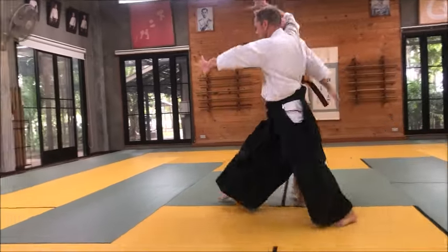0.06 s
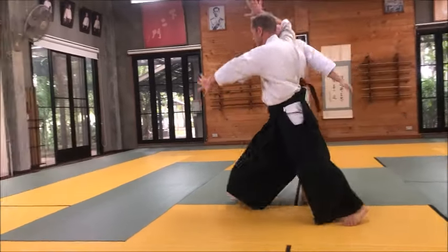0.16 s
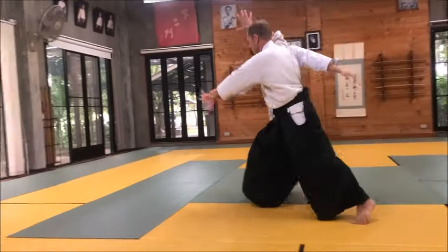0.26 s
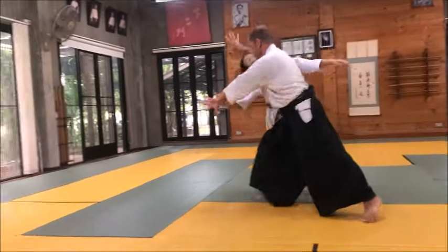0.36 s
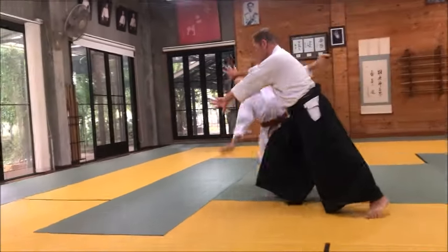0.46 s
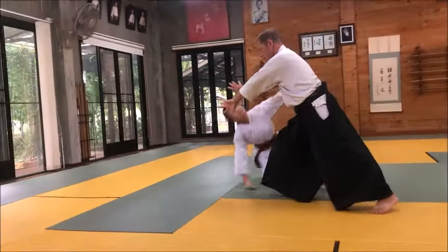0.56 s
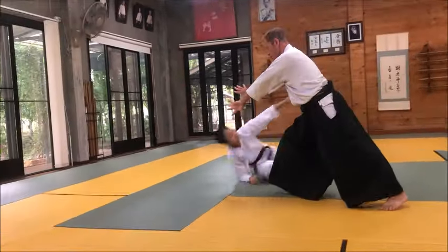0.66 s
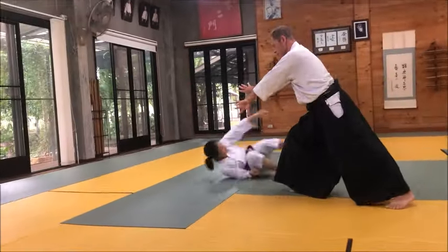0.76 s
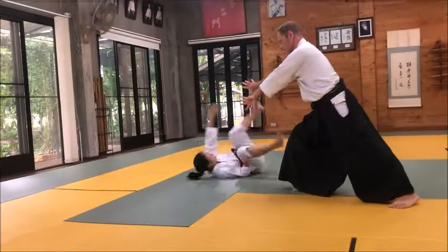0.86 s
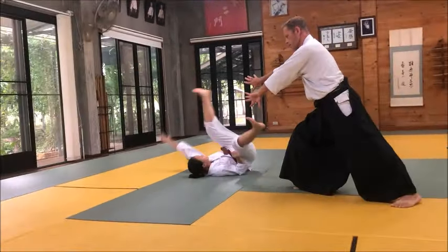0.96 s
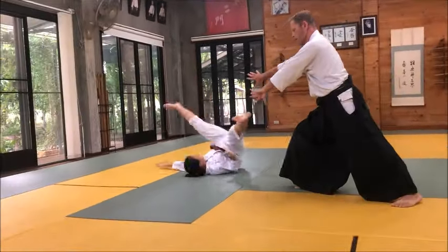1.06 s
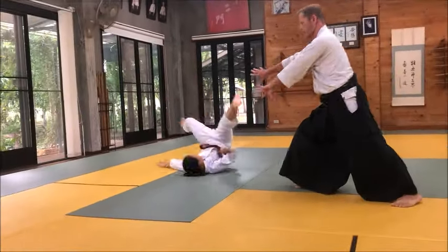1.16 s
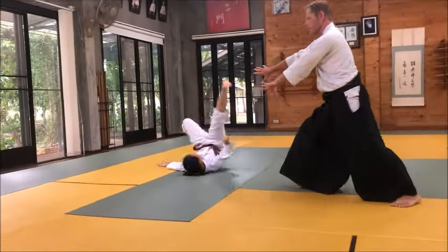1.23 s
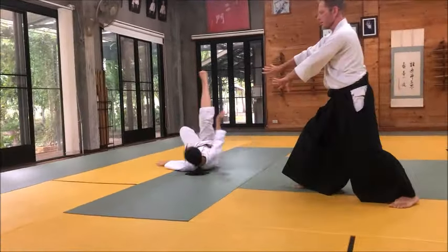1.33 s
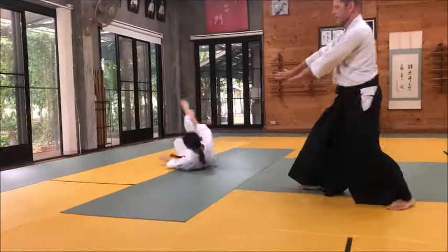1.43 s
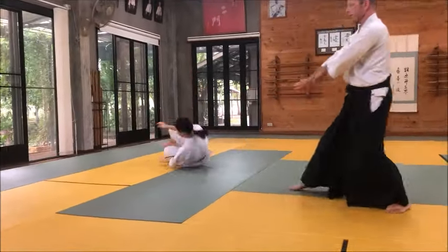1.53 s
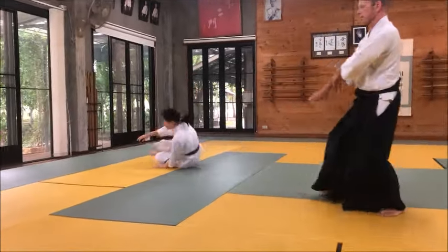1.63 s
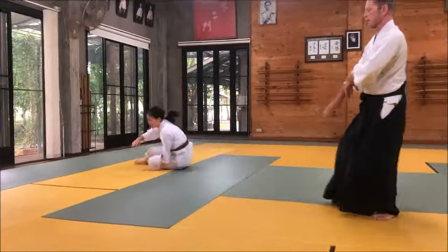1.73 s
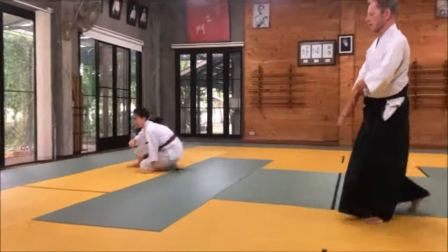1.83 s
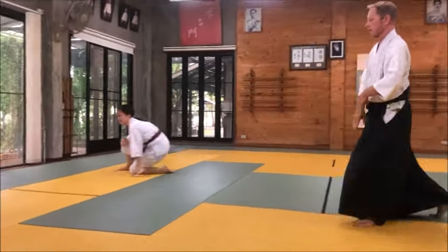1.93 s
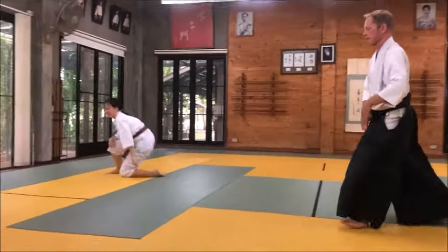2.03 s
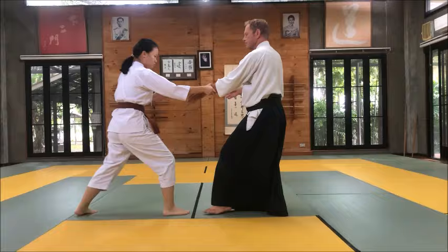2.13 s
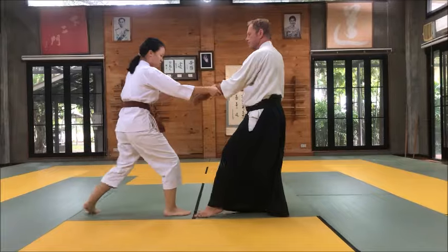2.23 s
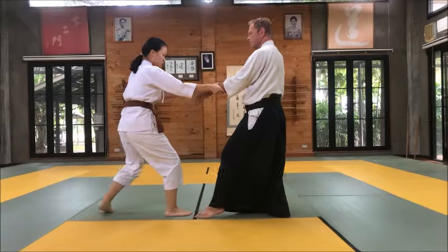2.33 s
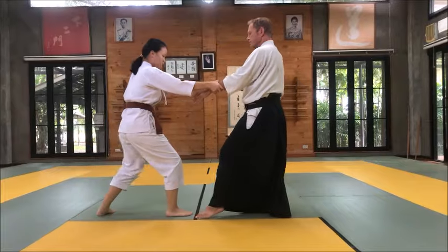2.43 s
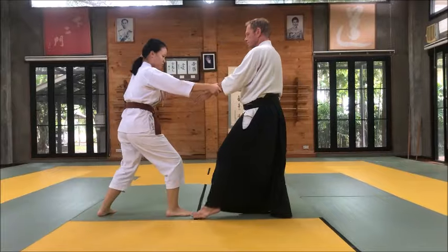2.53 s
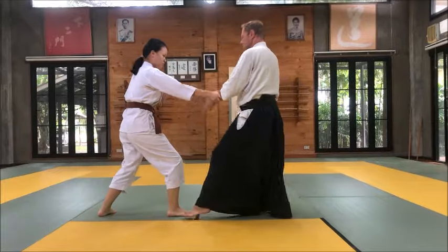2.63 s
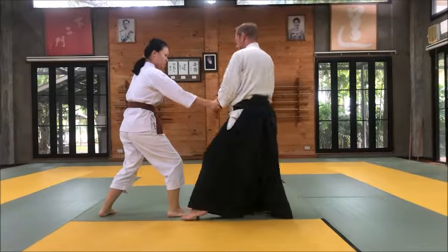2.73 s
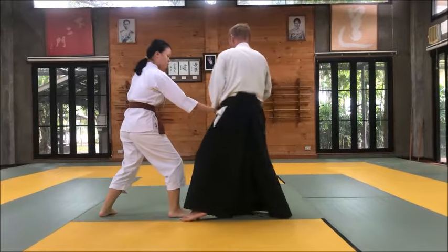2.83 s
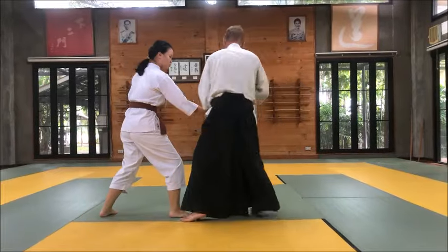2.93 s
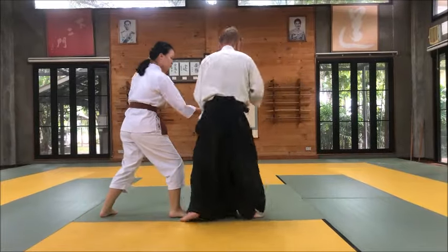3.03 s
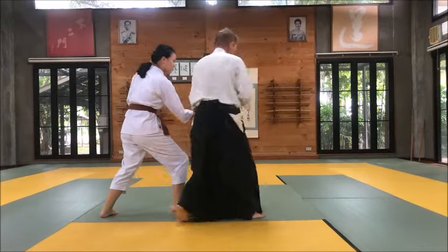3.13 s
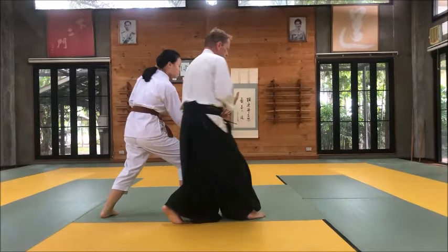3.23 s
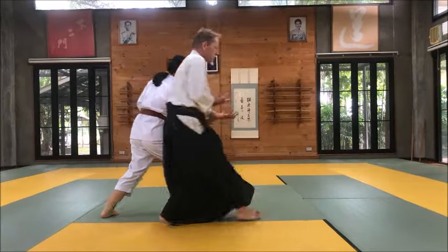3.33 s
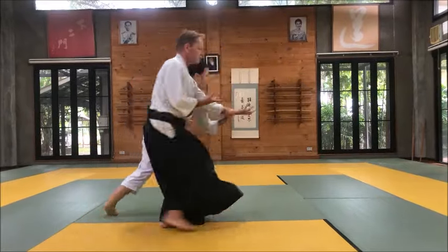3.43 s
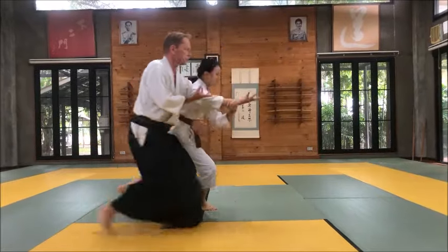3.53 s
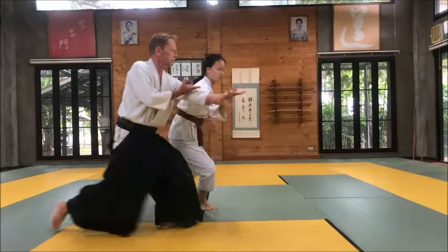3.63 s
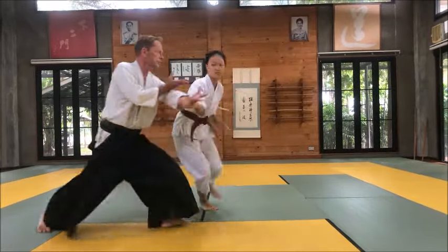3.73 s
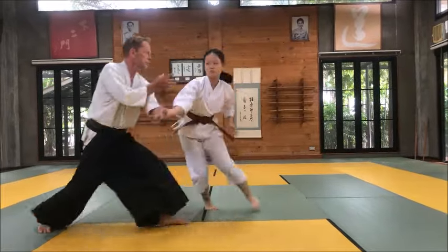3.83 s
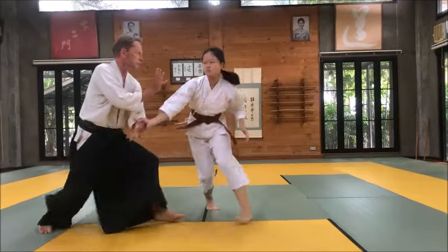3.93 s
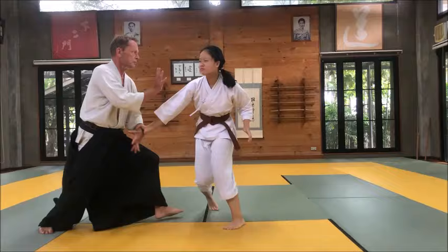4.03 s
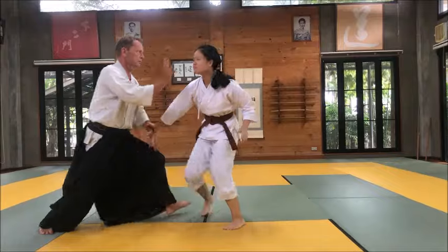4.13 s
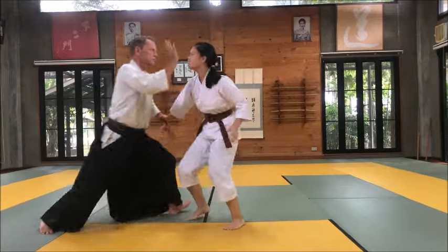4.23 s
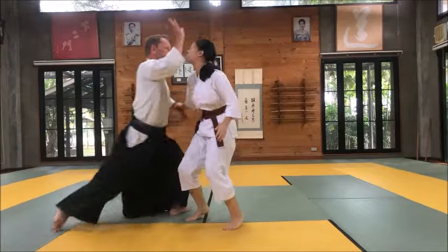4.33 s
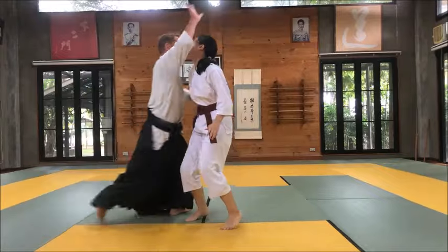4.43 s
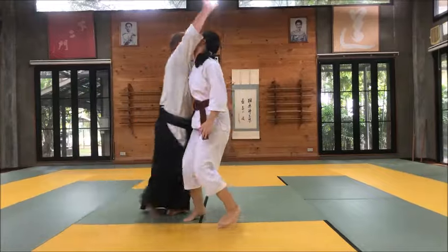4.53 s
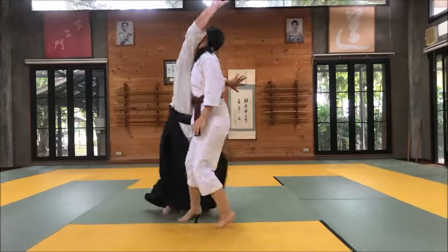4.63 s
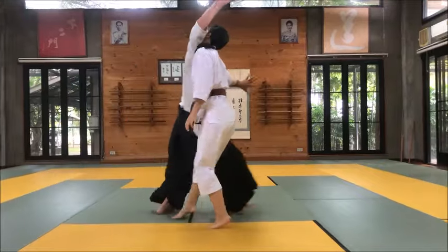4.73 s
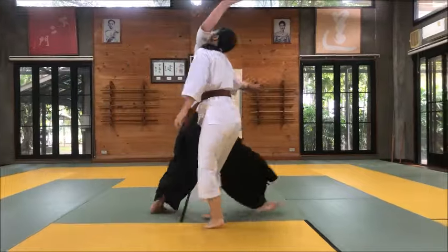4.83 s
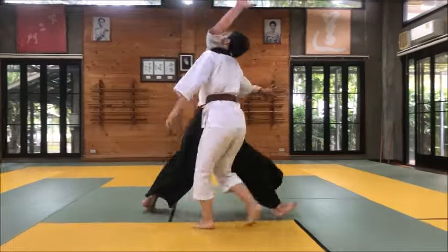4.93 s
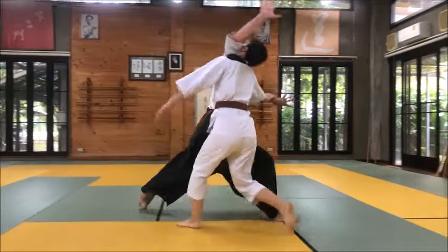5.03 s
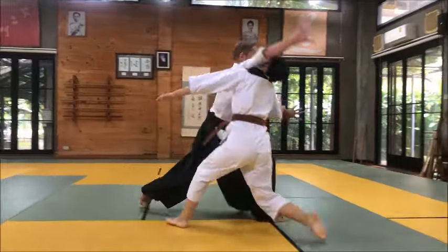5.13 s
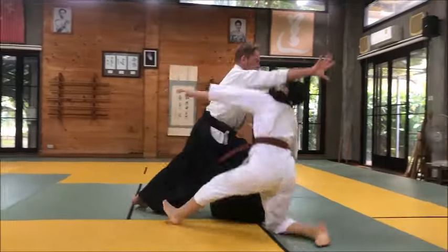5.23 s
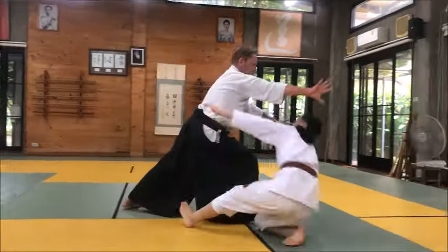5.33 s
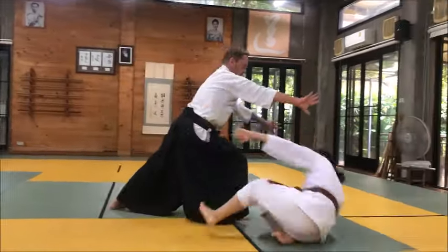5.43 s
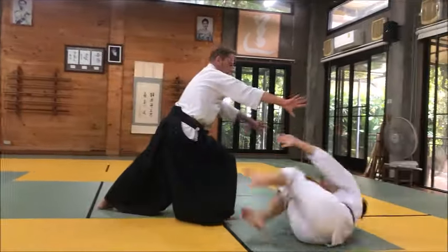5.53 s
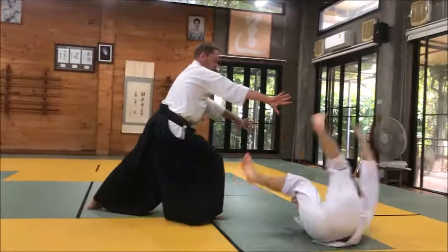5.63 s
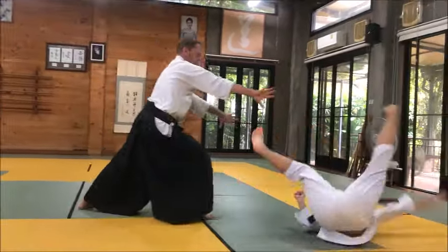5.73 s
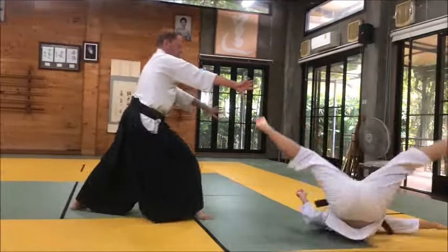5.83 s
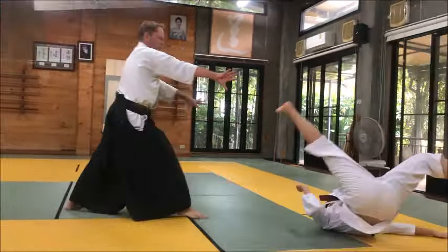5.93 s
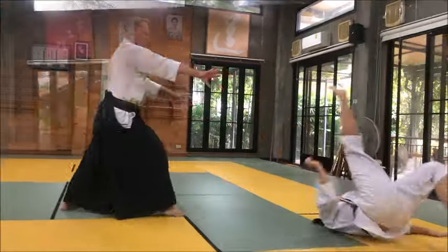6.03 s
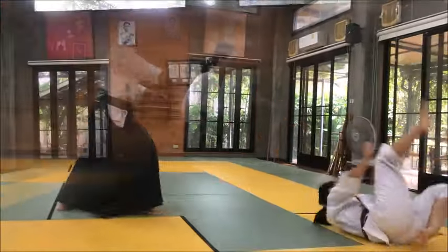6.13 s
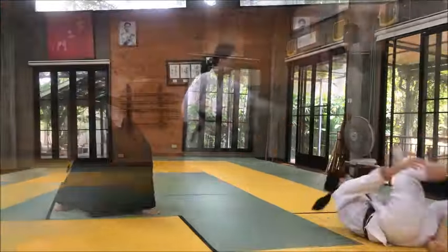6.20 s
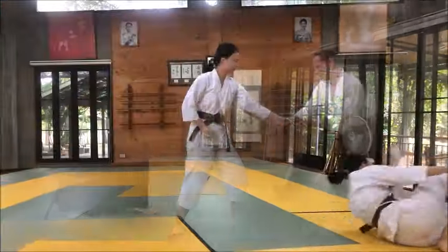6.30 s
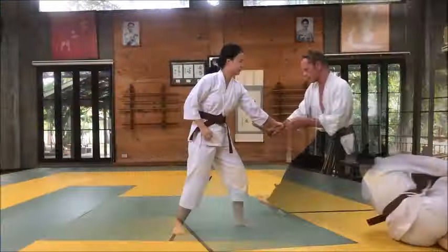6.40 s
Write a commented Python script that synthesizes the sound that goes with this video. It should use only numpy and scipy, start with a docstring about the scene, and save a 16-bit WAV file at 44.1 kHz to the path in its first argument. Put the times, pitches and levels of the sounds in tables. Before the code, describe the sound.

A soft thud and a swish of cotton lead into a distant, sharp slap on a vinyl mat, with a low boom ringing through the hall. Quiet barefoot steps and scuffs follow over the steady whir of fans. Near the end another person tumbles down, a hiss comes in, and the second fall smacks the mat close to the microphone with a deep thump.

```python
"""Two aikido throws in a hard-walled hall with fans running. Far off, a body rolls down with soft thuds
and an arm slaps the vinyl mat: a crack of expelled air, a thump that falls in pitch as bending waves
disperse, then the slow boom of the floor and the reverberation of the hall. Bare feet step and slide.
After five seconds a body rolls down again, a steady hiss sets in, and the second fall slaps close by."""
import sys
import numpy as np
from scipy import signal
from scipy.fft import rfft, irfft
from scipy.io import wavfile

SR = 44100
rng = np.random.default_rng(int(sys.argv[2]) if len(sys.argv) > 2 else 0)


def wav_out(sig):
    """Save sig, one row per channel (or a flat mono array), as 16-bit PCM at SR to the path in sys.argv[1]."""
    wavfile.write(sys.argv[1], SR, np.round(np.clip(np.atleast_2d(sig).T, -1, 1) * 32767).astype(np.int16))


N = 285062
TIME = np.arange(N) / SR

# Background noise spectra. Each row: frequency in Hz, relative level in dB.
FAN_SPECTRUM = [(82, -22), (140, -14), (264, -8), (296, -5.5), (328, -10.5), (497, -5.5), (545, -9.5),
                (695, -9), (2200, -31), (2860, -37), (4840, -120)]
RUMBLE_SPECTRUM = [(20, -18), (40, -6.5), (55, -2.5), (80, -0.5), (120, -12), (200, -3), (400, -42.5)]
MICROPHONE_SPECTRUM = [(1290, -55), (2200, -7), (3280, -5.5), (4980, -2.5), (5860, -7.5), (6630, -5.5),
                       (9420, -12), (11900, -7.5), (13400, -22), (15500, -18)]
LATE_HISS_SPECTRUM = [(200, -21), (600, 14), (1100, 7.5), (1700, 3), (3000, -3), (5000, -2.5), (8000, -6),
                      (12000, -13.5), (15500, -16)]
# Motor hum and blade tones. Each row: frequency in Hz, rms level in dB.
FAN_TONES = [(100.5, -53.5), (293, -60.5), (511, -71.5)]
# Reverberation of the hall. Each row: frequency in Hz, relative level in dB, 60 dB decay time in seconds.
HALL_BANDS = [(50, 3.5, 2), (110, 2.5, 0.47), (245, -2, 1.26), (436, -3, 0.69), (630, 9, 0.77),
              (800, 7.5, 1.03), (1180, -2, 1.4), (1540, 3, 1.29), (2040, 4, 1.16), (3350, 4.5, 0.72),
              (4460, 5, 1.1), (7700, 4.5, 0.9), (11900, 5, 0.6), (16000, 0, 0.37)]
# Early reflections off ceiling and walls. Each row: delay in seconds, gain in dB.
EARLY_REFLECTIONS = [(.0078, -16), (0.012, -11), (0.0359, -12)]
# Spectra of padding, floor and expelled air. Each row: frequency in Hz, relative level in dB.
PADDING_SPECTRUM = [(50, -43), (120, -26), (220, -1), (370, 3.5), (560, -5.5), (900, -20.5), (1600, -28.5),
                    (4000, -65)]
FLOOR_SPECTRUM = [(20, -36), (36, -2), (55, 9), (80, 2.5), (120, 4), (200, -13), (500, -45)]
CRACK_SPECTRUM = [(300, -14), (900, 4.5), (1250, 9), (1550, -5), (2100, -2.5), (2800, -5), (4200, -2.5),
                  (7000, -7.5), (12000, -4.5), (13500, -10), (16000, -6)]
# Soles sliding on vinyl. Each row: start in seconds, level in dB, rise time in seconds, centre in Hz.
SLIDES = [(0.68, -65, 0.009, 13100), (2.248, -55, 0.007, 4500), (3.528, -58, 0.029, 10800),
          (3.67, -60.5, 0.033, 10300), (4.556, -61.5, 0.049, 8900), (5.078, -57, 0.036, 10600)]
# Bare footfalls. Each row: start in seconds, level in dB.
FOOTFALLS = [(1.949, -43.5), (2.146, -43), (2.275, -40.5), (2.33, -43), (3.599, -44), (4.201, -35),
             (4.275, -41), (5.013, -39), (5.075, -39.5), (5.178, -35), (5.361, -35.5)]
# Hips, back and shoulders rolling over the mat. Each row: start in seconds, level in dB,
# hold in seconds, floor boom in dB, floor pitch in Hz.
BODY_ROLLS = [(0.676, -36.5, .15, -32.5, 48.4), (1.65, -46, 0.076, -37.5, 49),
              (5.423, -40, 0.165, -37.5, 56.5), (5.844, -50, 0.096, -46, 70.5)]
# Modes of the mat and its base. Each row: frequency in Hz, level relative to the thump in dB,
# 60 dB decay time in seconds.
PANEL_MODES = [(224, -12, 0.32), (275, -34, 0.14), (415.2, -14.5, 0.25)]
# The far and the near breakfall. Each row: start in seconds, weight thud in dB, floor boom in dB,
# floor pitch in Hz, trunk thump in dB, palm ring in dB, palm pitch in Hz, crack cutoff in Hz,
# thump gain into the hall in dB, crack gain into the hall in dB.
BREAKFALLS = [(1.21, -30, -22.5, 48.4, -18, -19, 2045, 3970, 1, 4.5),
              (5.967, -25.5, -18.5, 53.5, -26, -11.5, 1135, 10100, -2.5, -6.5)]
# Slaps on the mat, with their close echoes and after-taps. Each row: start in seconds, thump in dB,
# final pitch in Hz, crack in dB.
MAT_SLAPS = [(1.2104, -9, 301.5, -19), (1.2190, -15, 192, -31), (1.235, -24.5, 225, -41),
             (1.2490, -14, 248, -27.5), (1.2718, -14.5, 417, -34), (5.416, -27, 363, -49),
             (5.9692, -6, 192, -19.5), (5.9773, -9.5, 297, -19), (5.9838, -9.5, 349, -23),
             (5.9889, -11.5, 294, -25), (6.041, -22, 340, -26.5)]

STEP_RISE_S, THUMP_RISE_S = 0.014, 0.0042


def undb(db):
    """Amplitude grows tenfold for every 20 dB."""
    return 10 ** (np.asarray(db) / 20)


def on_log_axis(points, size):
    """Interpolation in log frequency carries (Hz, value) points to the bins of a transform."""
    hz, value = np.transpose(points)
    return np.interp(np.log(np.fft.rfftfreq(size, 1 / SR) + 1e-9), np.log(hz), value)


def coloured(x, spectrum):
    """Spectral weighting colours x; the result has unit rms."""
    y = irfft(rfft(x) * undb(on_log_axis(spectrum, len(x))), len(x))
    return y / y.std()


def noise(spectrum):
    """Filtered white noise takes on the spectrum of its filter."""
    return coloured(rng.standard_normal(N), spectrum)


def drift(per_s):
    """Interpolation between random values gives a drift with a spread near 1."""
    count = int(N / SR * per_s) + 2
    return np.interp(TIME * per_s, np.arange(count), rng.standard_normal(count))


def swell(t, peak_s, steep):
    """A power-law rise times an exponential decay peaks at 1 at peak_s."""
    return (t / peak_s * np.exp(1 - t / peak_s)) ** steep


def add(track, start_s, sound):
    """Superposition: a sound adds to what the track already holds."""
    i = int(start_s * SR)
    track[i:i + len(sound)] += sound[:N - i]


def hiss(microphone_db=-64, late_db=-44, late_start_s=5.842, fade_s=0.012):
    """Stationary noise: the microphone hisses faintly; a louder hiss sets in late and stays."""
    onset = np.clip((TIME - late_start_s) / fade_s, 0, 1)
    microphone = undb(microphone_db) * noise(MICROPHONE_SPECTRUM)
    return microphone + undb(late_db) * noise(LATE_HISS_SPECTRUM) * onset


def fans(air_db=-48, rumble_db=-58, flutter_db=0.8, waver_hz=0.74):
    """Moving air gives broadband noise and rotation gives tones, above the rumble of the building."""
    out = undb(air_db + flutter_db * drift(10)) * noise(FAN_SPECTRUM)
    out += undb(rumble_db) * noise(RUMBLE_SPECTRUM)
    for hz, db in FAN_TONES:
        phase = 2 * np.pi * np.cumsum(hz + waver_hz * drift(4.75)) / SR
        out += np.sqrt(2) * undb(db + flutter_db * drift(1.7)) * np.sin(phase)
    return out


def hall(x, wet_db=-35, gap_s=0.017, build_s=0.0035, grain_db=5.0):
    """Reverberation: a diffuse field builds up, then decays exponentially at each band's own rate."""
    t = TIME[:int(1.5 * SR)]
    hz, db, t60 = np.transpose(HALL_BANDS)
    returns = rng.standard_normal(len(t))
    unevenness = undb(grain_db * np.exp(-10 * t) * rng.standard_normal(len(t)))  # sparse at first
    spectrum = rfft(returns * unevenness)
    response = np.zeros(len(t))
    for band, band_db, band_t60 in zip(np.eye(len(hz)), db, t60):
        part = irfft(spectrum * on_log_axis(np.c_[hz, band], len(t)), len(t))
        response += undb(band_db) * part * np.exp(-np.log(1000) * t / band_t60)
    response *= 1 - np.exp(-np.maximum(t - gap_s, 0) / build_s)
    return undb(wet_db) * signal.fftconvolve(x, response)[:N]


def reflections(x, cutoff_hz=11000):
    """Specular reflection: the nearest hard surfaces return delayed, slightly duller copies."""
    out = np.zeros(N)
    dulled = signal.lfilter(*signal.butter(1, cutoff_hz, fs=SR), x)
    for delay_s, db in EARLY_REFLECTIONS:
        add(out, delay_s, undb(db) * dulled)
    return out


def roll_pressure(attack_s=0.011, release_s=0.057, rock_db=-7, rock_s=0.33):
    """Contact pressure rises quickly, holds from hip to shoulder and eases as the back rocks on."""
    out, t = np.zeros(N), TIME[:SR]
    for start, db, hold_s, *_ in BODY_ROLLS:
        after = np.maximum(t - hold_s, 0)
        release = np.maximum(np.exp(-after / release_s), undb(rock_db) * np.exp(-after / rock_s))
        add(out, start, undb(db) * np.minimum(t / attack_s, 1) * release)
    return out


def friction(hz, size, grain_db=6):
    """Friction is a dense train of tiny uneven impulses, heard as a noise band around hz."""
    grains = rng.standard_normal(size) * undb(grain_db * rng.standard_normal(size))
    return coloured(grains, [(hz / 10, -26), (hz / 2, -10), (hz, 0), (hz * 2, -14)])


def swishes(jacket_db=-37, jacket_hz=4970, catch_db=3.5):
    """Stick-slip: the cotton jacket and the bare soles catch and slide on the vinyl."""
    out = undb(jacket_db) * roll_pressure() * friction(jacket_hz, N)
    for start, db, rise_s, hz in SLIDES:
        add(out, start, undb(db) * friction(hz, SR) * swell(TIME[:SR], rise_s, steep=2))
    return out * undb(catch_db * drift(90))


def thuds(landing_s=0.044, settle_s=0.25, shuffle_start_s=3.4, shuffle_db=-55.5):
    """Soft impacts excite mainly low frequencies: the padding patters and the floor shudders."""
    padding, t = roll_pressure(), TIME[:SR]
    floor = undb(0.5) * padding
    for start, db, *_ in BREAKFALLS:  # the weight lands, then the legs settle
        push = undb(db) * (swell(t, landing_s, steep=0.6) + undb(-22) * swell(t, settle_s, steep=3.3))
        add(padding, start, push)
        add(floor, start, undb(-2) * push)
    for start, db in FOOTFALLS:
        push = undb(db) * swell(t, STEP_RISE_S, steep=0.6)
        add(padding, start, undb(-10) * push)
        add(floor, start, undb(-9) * push)
    shuffle = (TIME > shuffle_start_s) * undb(shuffle_db + 4 * drift(7))  # light footwork
    patter = np.hypot(padding, shuffle) * noise(PADDING_SPECTRUM)
    shudder = np.hypot(floor, undb(-3) * shuffle) * noise(FLOOR_SPECTRUM)
    return patter + shudder


def floor_modes(hz, rise_s, upper_ratio=1.8, upper_db=-8):
    """Damped vibration: mat and floor swing up in two low modes and soon come to rest."""
    t = TIME[:SR]
    swing = np.sin(2 * np.pi * hz * t) + undb(upper_db) * np.sin(2 * np.pi * upper_ratio * hz * t)
    return swing * swell(t, rise_s, steep=3)


def booms(floor_rise_s=0.061, trunk_hz=137, trunk_rise_s=0.016, step_hz=91, step_spread=0.087):
    """The elastic floor yields to each roll and fall; trunk and feet add shorter, higher thumps."""
    out = np.zeros(N)
    for start, _, hold_s, boom_db, hz in BODY_ROLLS:
        add(out, start + 0.308 * hold_s, undb(boom_db) * floor_modes(hz, floor_rise_s))
    for start, _, boom_db, hz, trunk_db, *_ in BREAKFALLS:
        add(out, start, undb(boom_db) * floor_modes(hz, floor_rise_s))
        add(out, start, undb(trunk_db) * floor_modes(trunk_hz, trunk_rise_s))
    for start, db in FOOTFALLS:
        hz = step_hz * (1 + step_spread * rng.standard_normal())
        add(out, start, undb(db) * floor_modes(hz, STEP_RISE_S))
    return out


def panel_ring(detune=0.025):
    """Free vibration: the base of the mat rings on in its modes after each slap."""
    out, t = np.zeros(N), TIME[:SR]
    for start, thump_db, *_ in MAT_SLAPS:
        for hz, db, t60 in PANEL_MODES:
            ring = np.sin(2 * np.pi * hz * (1 + detune * rng.standard_normal()) * t)
            decay = np.exp(-np.log(1000) * t / t60)
            add(out, start + THUMP_RISE_S, undb(thump_db + db) * ring * decay)
    return out


def mat_thump(t, db, final_hz, sweep_hz=1646, glide_s=0.0016):
    """Dispersion: short bending waves outrun long ones, so the pitch falls, further for a hard slap."""
    hz = final_hz + sweep_hz * undb(db) * np.exp(-t / glide_s)
    return undb(db) * np.sin(2 * np.pi * np.cumsum(hz) / SR) * swell(t, THUMP_RISE_S, steep=2)


def air_crack(t, db, cutoff_hz, burst_s=0.0012, sleeve_db=-16, sleeve_s=0.011):
    """Compressed air bursts from under the skin, then the sleeve flaps; gives crack and hall click."""
    lowpass = signal.butter(1, cutoff_hz, fs=SR)
    air = signal.lfilter(*lowpass, coloured(rng.standard_normal(len(t)), CRACK_SPECTRUM))
    envelope = swell(t, burst_s, steep=2) + undb(sleeve_db) * swell(t, sleeve_s, steep=1.8)
    crack = undb(db) * air / air.std() * envelope
    # the hall gathers the crack from all directions, evening it out to one click of equal energy
    click = signal.lfilter(*lowpass, coloured(signal.unit_impulse(len(t), 100), CRACK_SPECTRUM))
    return crack, click * np.linalg.norm(crack) / np.linalg.norm(click)


def palm_ring(t, db, hz, rise_s=0.0015):
    """Cavity resonance: the air trapped under a cupped hand rings briefly."""
    return undb(db) * np.sin(2 * np.pi * hz * t) * swell(t, rise_s, steep=4.9)


def slaps(palm_hall_db=-1.5):
    """Impact: a slap cracks and bends the mat; gives the direct sound and what reaches the hall."""
    direct, to_hall, t = np.zeros(N), np.zeros(N), TIME[:SR // 4]
    for start, thump_db, hz, crack_db in MAT_SLAPS:
        nearest_fall = min(BREAKFALLS, key=lambda fall: abs(fall[0] - start))
        fall_s, *_, palm_db, palm_hz, cutoff_hz, hall_thump_db, hall_crack_db = nearest_fall
        thump = mat_thump(t, thump_db, hz)
        crack, click = air_crack(t, crack_db, cutoff_hz)
        add(direct, start, thump + crack)
        add(to_hall, start, undb(hall_thump_db) * thump + undb(hall_crack_db) * click)
        if abs(start - fall_s) < 0.005:  # the hand lands first
            palm = palm_ring(t, palm_db, palm_hz)
            add(direct, start, palm)
            add(to_hall, start, undb(palm_hall_db + hall_thump_db) * palm)
    return direct, to_hall


def scene(soft_to_hall_db=-6):
    """Direct sound, reverberant field and background superpose at one point."""
    direct, to_hall = slaps()
    soft = thuds() + swishes()
    room = reflections(direct) + hall(to_hall + undb(soft_to_hall_db) * soft)
    return (direct + panel_ring() + booms() + soft + room + fans() + hiss())[None]


def record(dry, low_hz=33, top_hz=15800):
    """Band limiting: the microphone loses the deepest bass and the highest treble."""
    highpass = signal.butter(4, low_hz, "high", fs=SR, output="sos")
    lowpass = signal.ellip(10, 0.2, 80, top_hz, fs=SR, output="sos")
    return signal.sosfilt(lowpass, signal.sosfilt(highpass, dry))


dry = scene()
out = record(dry)
wav_out(out)
```